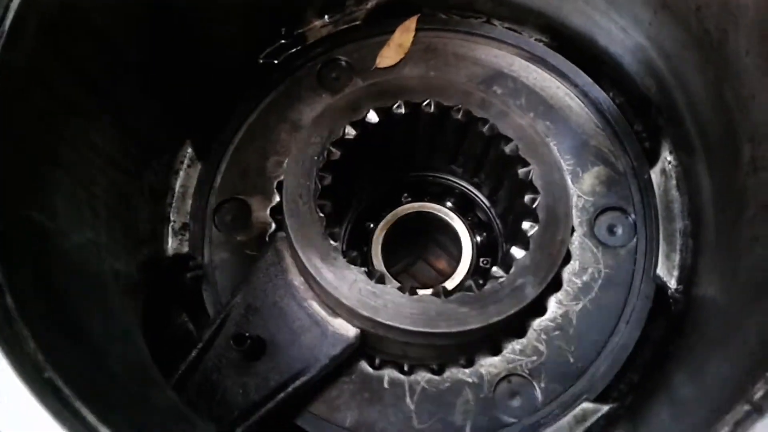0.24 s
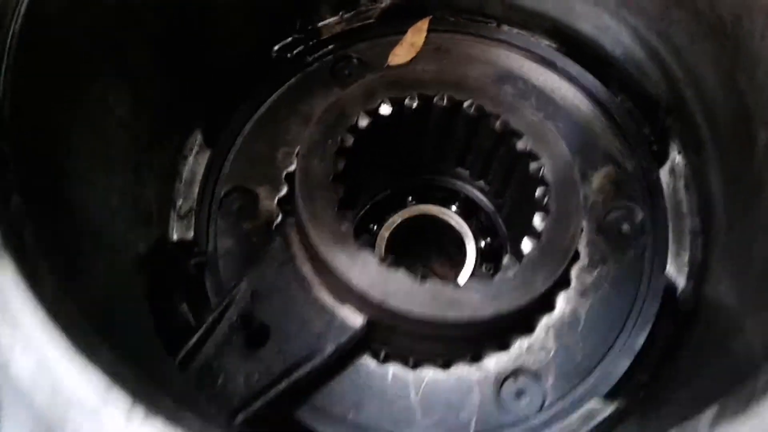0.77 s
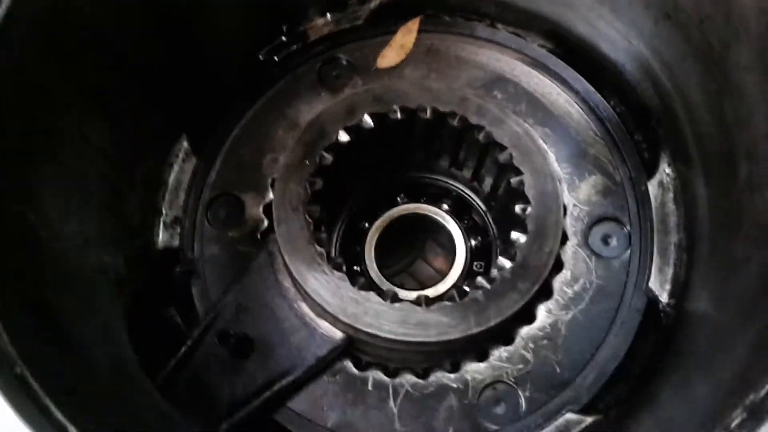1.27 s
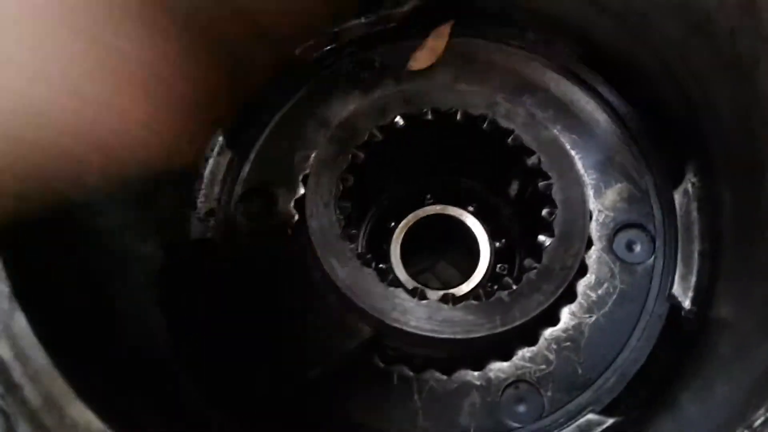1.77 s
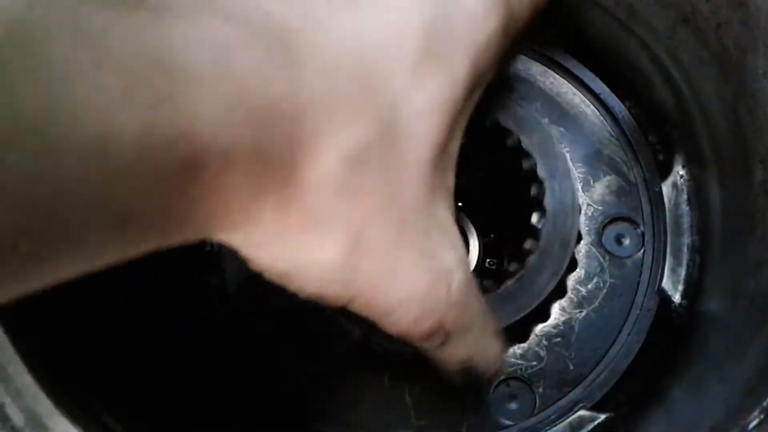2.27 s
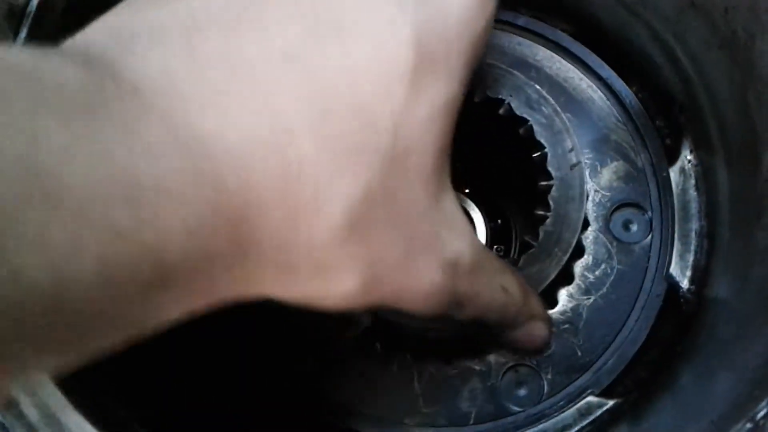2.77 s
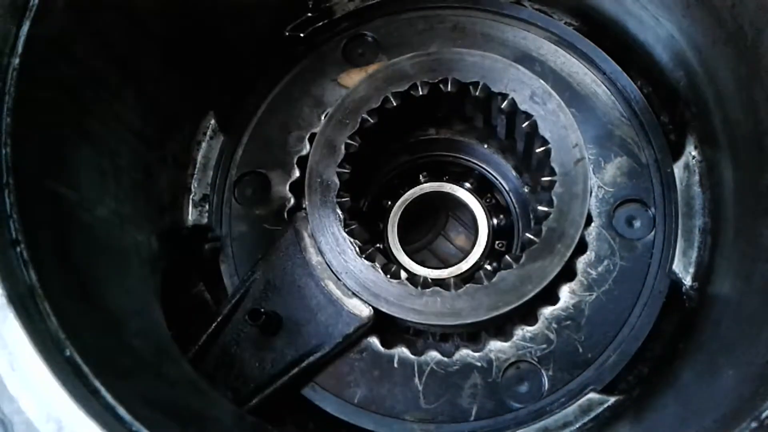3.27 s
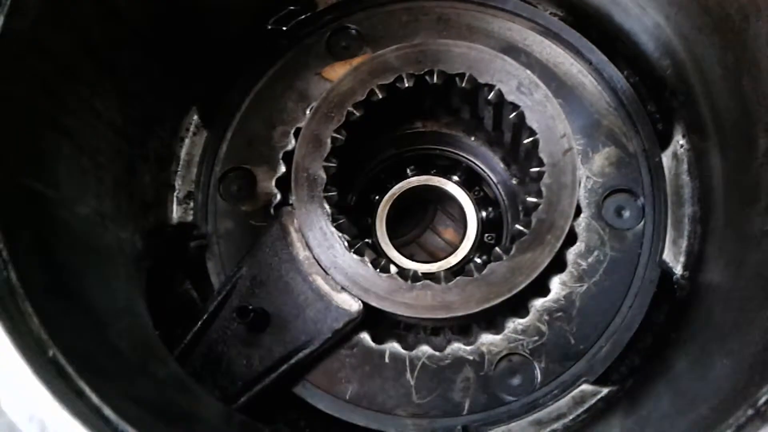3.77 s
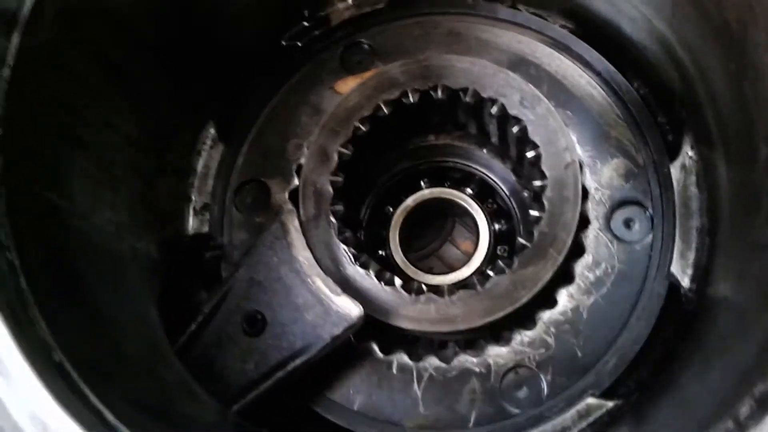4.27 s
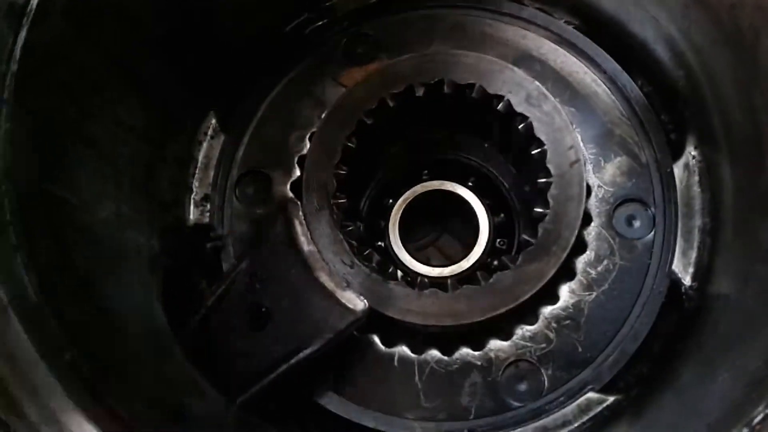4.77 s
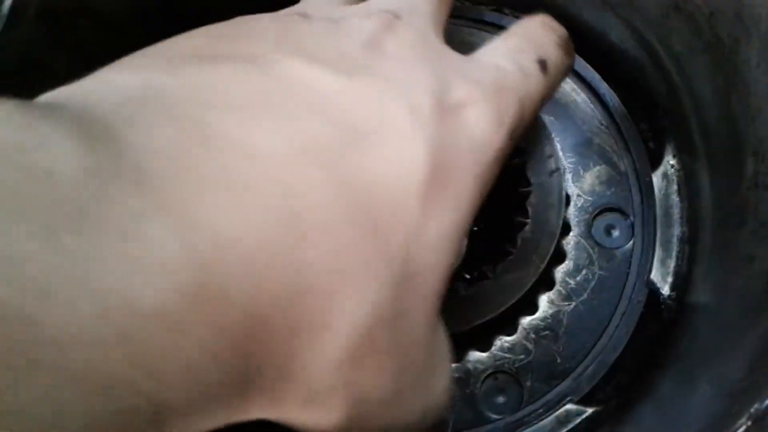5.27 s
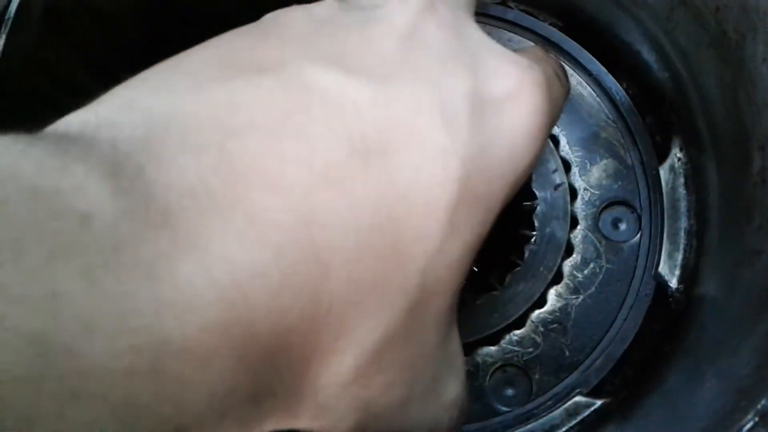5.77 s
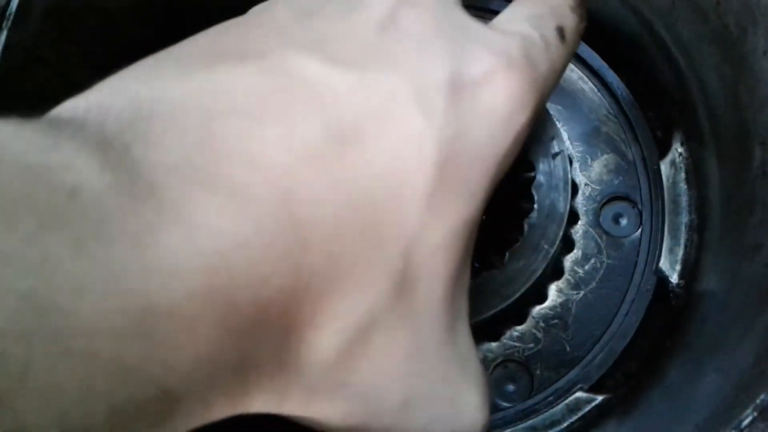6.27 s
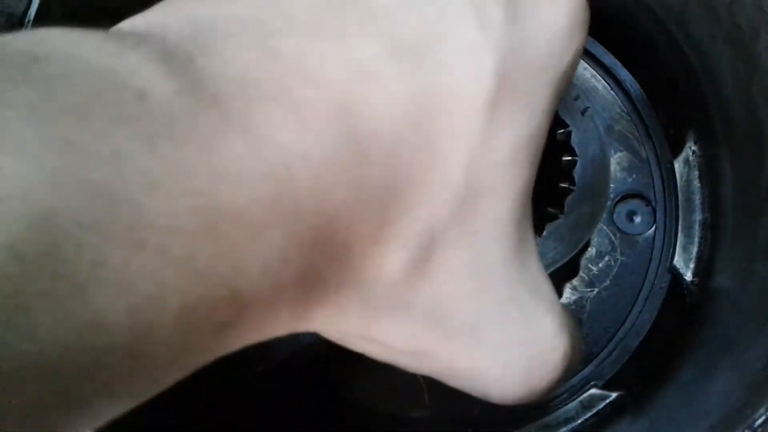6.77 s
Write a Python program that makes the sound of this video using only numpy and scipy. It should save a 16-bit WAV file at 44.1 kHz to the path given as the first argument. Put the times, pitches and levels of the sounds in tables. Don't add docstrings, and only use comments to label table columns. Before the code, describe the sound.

Very close, a loose steel gear clicks and clanks in a deep metal housing. Shaft knocks come in tight clusters, then fingers turn it tooth on tooth with quick scrapes and short pinging rings. More hard knocks follow near four seconds, one heavy clank before five, then sparse clicks and a rattling roll. Low workshop air noise and a faint cricket lie behind; the sound leans right, duller on the left.

```python
import sys
import numpy as np
from scipy import signal
from scipy.fft import rfft, irfft, next_fast_len
from scipy.io import wavfile
from scipy.ndimage import uniform_filter1d

SR = 44100
rng = np.random.default_rng(int(sys.argv[2]) if len(sys.argv) > 2 else 0)


def store_wav(level_fs):
    pcm = np.round(np.clip(np.atleast_2d(level_fs), -1, 1) * 32767)
    wavfile.write(sys.argv[1], SR, pcm.T.astype(np.int16))


def volts(x):
    e = np.asarray(x, float) / 20
    return 10 ** e


N = 310271

# (time [s], teeth peak [dB], teeth note [Hz], web peak [dB], web note [Hz])
KNOCK_OUTER = [(0.3152, -34.5, 2100, -34, 1340), (0.3268, -31, 2300, -28, 1260),
               (0.956, -27.5, 3310, -24, 588), (0.9624, -30.5, 3350, -28, 720),
               (1.1224, -40, 3310, -44.5, 1680), (1.281, -21.5, 3160, -33, 620),
               (1.287, -29, 3300, -30, 716), (1.3173, -35, 2466, -39, 1970), (1.3523, -31, 3500, -48, 1970),
               (1.5399, -42, 2300, -28, 635), (3.7035, -36, 3360, -39, 1780),
               (3.8726, -29, 3320, -24, 1690), (3.889, -37.5, 3170, -32, 1220),
               (3.8984, -30, 3050, -25, 970), (3.907, -26, 3130, -24, 940), (3.918, -33, 4280, -34, 930),
               (3.9377, -21, 3460, -37, 1660), (3.943, -30, 3360, -30.5, 1690),
               (3.982, -35, 3370, -35, 600), (4.0227, -39.5, 2360, -33.5, 604),
               (4.2253, -34.5, 2960, -35.5, 640), (4.2416, -21, 2700, -23.5, 700),
               (4.248, -27.5, 2780, -28, 683), (4.2544, -40, 2700, -42, 920),
               (4.5375, -34.5, 5020, -41, 1830), (4.7634, -22.5, 3550, -13, 1493),
               (4.7701, -20, 3310, -10.5, 810), (5.159, -47, 3270, -52, 895)]
KNOCK_INNER = [(0.2593, -46, 3600, -47.5, 1980), (0.3316, -22, 3540, -26, 2070),
               (0.3367, -24.5, 4080, -49, 1710), (1.2351, -48, 4230, -40, 1220),
               (1.253, -22.5, 3310, -30, 2030), (1.259, -27, 3230, -27, 1660), (1.267, -13, 4150, -25, 614),
               (1.275, -22.5, 3000, -36, 590), (1.3373, -33.5, 4000, -34.5, 1340),
               (1.3674, -32, 4060, -39, 1990), (2.0343, -43, 3800, -40, 940),
               (2.1081, -37, 3770, -40.5, 2010), (2.1188, -45, 3700, -53, 1710),
               (3.6627, -27.5, 4270, -38, 1640), (3.9254, -19, 4300, -44, 960),
               (3.93, -11, 4110, -19, 2080), (4.3092, -12.5, 4530, -20, 1770),
               (4.3234, -10.5, 4070, -18, 624), (4.3311, -22, 3310, -49, 950),
               (4.7864, -23.5, 3220, -22, 580)]
TURN_OUTER = [(2.3197, -19, 3170, -19.5, 1180), (2.376, -35, 4150, -25, 970), (2.385, -34, 4150, -29, 940),
              (2.4167, -25.5, 3780, -34, 945), (2.435, -28, 3230, -30, 1860),
              (2.5236, -12, 3500, -16, 1754), (2.5376, -22, 3020, -14.5, 1300),
              (2.548, -10.5, 3260, -14, 1276), (2.5594, -12, 3220, -18.5, 950),
              (2.5704, -21, 3230, -25.5, 1330), (2.6887, -16.5, 4260, -13, 1180),
              (2.7247, -24.5, 3200, -21, 920), (2.748, -36, 4200, -34, 700), (6.2868, -13, 3290, -24, 1236)]
TURN_INNER = [(2.2884, -35, 4250, -25.5, 970), (2.3452, -33, 4220, -41, 595),
              (2.4439, -9.5, 3570, -12, 960), (2.4514, -18, 4300, -17, 1840),
              (2.4658, -26, 4270, -39, 1690), (2.487, -36, 4160, -29, 1700),
              (2.701, -16.5, 4450, -17, 1590), (5.5084, -42.5, 3870, -36, 660),
              (5.5688, -13, 4160, -17, 1185), (5.5804, -29, 4150, -22, 1844),
              (6.2413, -16.5, 3770, -18, 1960), (6.3051, -31, 4150, -39, 620)]
ROLL_OUTER = [(6.4776, -32, 4140, -30.5, 940), (6.4916, -18, 3200, -25.5, 945),
              (6.8024, -41, 2580, -30, 575)]
ROLL_INNER = [(6.4178, -35, 3700, -42.5, 960), (6.511, -17.5, 4200, -26.5, 2200),
              (6.5255, -22, 4130, -34, 1240), (6.5392, -12, 4080, -18, 2170),
              (6.5531, -22, 4250, -23, 1250), (6.5614, -15, 4060, -19.5, 1270),
              (6.5722, -15, 4260, -21.5, 936), (6.6094, -37, 4150, -32, 700),
              (6.6473, -25, 4020, -38, 1300), (6.69, -38, 4070, -33, 580), (6.8125, -39.5, 4260, -29, 895),
              (7.0315, -37, 3130, -27, 613)]
# (contacts, contact time [ms], noisy part [dB], decay factor [1], share of the first blow [1])
KINDS = [(KNOCK_OUTER, 6.7, 2.36, 0.66, 1.01), (KNOCK_INNER, 4.3, 4.6, 0.71, 1.03),
         (TURN_OUTER, 5.5, -2.2, 0.74, 0.83), (ROLL_OUTER, 5., -5, 0.74, .2),
         (TURN_INNER, 6.1, -1.5, 0.57, 1.01), (ROLL_INNER, 4.9, -4, .6, 0.12)]
# (time [s], peak [dB])
EDGES = [(0.2598, -57), (0.334, -38), (0.9574, -44), (1.1207, -44.5), (1.2515, -27), (1.267, -27),
         (6.511, -40), (2.0343, -45), (2.1188, -39.5), (2.3196, -38), (2.342, -38.5), (2.4174, -43),
         (2.4437, -27), (2.522, -35), (2.5456, -31.5), (2.687, -37), (6.649, -47), (3.663, -38.5),
         (3.923, -29), (3.93, -21), (4.3106, -25.5), (4.321, -28), (5.571, -39.5), (6.2406, -26),
         (6.2854, -33)]
# (frequency [Hz], level [dB])
EDGE = [(3500, -12.5), (5000, 9), (6500, 1.5), (8500, -9.5), (12000, -19.5), (16000, -26.5)]
# (frequency [Hz], level [dB], T60 [s])
TEETH = [(2520, 5, 0.011), (2972, -3.5, 0.047), (3205, -0.5, 0.034), (3347, 4.5, 0.016), (3770, -2, 0.038),
         (4110, 0, 0.043), (4260, -5, 0.052), (4694, 1, 0.014), (5030, -7.5, 0.03)]
WEB = [(694, -2, 0.036), (814, -10.5, 0.059), (952, -3, 0.074), (1250, 12, 0.017), (1319, -6.5, 0.022),
       (1700, -0.5, 0.12), (1840, 10, 0.037), (2070, -3.5, 0.1)]
# (level [dB], T60 [s])
TOOTH_NOTE, WEB_NOTE = (0, 0.026), (9.1, 0.046)

# (time [s], frequency [Hz], level [dB], T60 [s])
NOTES = [(1.234, 4150, -44, .1), (1.239, 1340, -41, 0.093), (2.287, 1780, -36, 0.072),
         (2.379, 953, -28, 0.17), (2.38, 1700, -33, 0.14), (2.445, 955, -20.5, .08),
         (2.451, 1820, -15, 0.047), (2.549, 3230, -12, .04), (2.561, 3225, -15, 0.074),
         (2.561, 4280, -24.5, 0.08), (2.689, 1194, -18.5, 0.066), (2.69, 1837, -16, 0.042),
         (2.7, 3160, -24, 0.09), (2.703, 4300, -22, 0.057), (.26, 2000, -44, .03), (.315, 480, -32, .05),
         (2.524, 4700, -25, .03), (2.526, 1760, -25, .04), (3.872, 3100, -28, .08), (3.872, 4400, -34, .1),
         (3.898, 1800, -30, .05), (3.906, 3130, -26, .05), (3.931, 4120, -19, .05), (3.933, 3313, -21, .06),
         (6.51, 10500, -54, .03), (6.647, 10300, -57, .03), (4.31, 4700, -24, .03), (4.311, 3280, -21, .05),
         (4.324, 4070, -25, 0.04), (4.7646, 1490, -7, 0.023), (4.768, 3307, -20.5, 0.056),
         (4.768, 4560, -29, 0.054), (5.569, 1175, -25.5, 0.044), (5.57, 1846, -22, 0.052),
         (5.585, 702, -39.5, 0.22), (5.624, 922, -41, 0.18), (6.242, 3790, -16.5, 0.029),
         (6.243, 1915, -21, 0.029), (6.255, 1840, -36.5, .12), (6.287, 3330, -7, .02),
         (6.287, 1270, -22, 0.036), (6.416, 3790, -40, 0.09), (6.478, 950, -31, 0.051),
         (6.478, 1900, -30, .04), (6.492, 3150, -23.5, 0.073), (6.54, 2150, -29, .04),
         (6.555, 3150, -21, 0.061), (6.562, 1230, -21.5, 0.067)]

# (time [s], peak [dB], decay factor [1])
FLOOR_THUDS = [(0.066, -42.5, 0.69), (0.343, -31, 0.88), (0.966, -8, 0.87), (1.267, -12, 1.14),
               (1.473, -49, 1.6), (2.217, -40, 0.35), (2.285, -29.5, 1.6), (2.377, -18.5, 1.08),
               (3.661, -36, 0.82), (3.708, -33, 0.7), (3.859, -20, 1.2), (3.924, -18, 0.63),
               (4.013, -10, 0.85), (4.344, -17.5, 0.66), (4.687, -37, 1.5), (5.505, -30.5, 0.84),
               (5.849, -40, 0.69), (6.242, -22.5, 0.71), (6.802, -29, 0.81)]
WALL_THUDS = [(0.33, -24.5, 0.63), (2.027, -28.5, 0.4), (2.535, -23, 1.46), (3.45, -37.5, 0.56),
              (4.763, -18, 1.14), (5.566, -31.5, 2.43), (6.42, -32, 10), (6.689, -34, 0.95)]
RIM_THUDS = [(0.957, -11, 0.6), (1.539, -28.5, 0.92), (2.055, -32, 0.33), (2.263, -37.5, 0.68),
             (2.317, -21.5, 1.16), (2.44, -18.5, 0.62), (2.516, -29, 0.86), (2.569, -19, 0.32),
             (2.692, -17, 0.47), (2.704, -16.5, 0.66), (3.964, -20, 0.37), (4.242, -20.5, 0.55),
             (4.316, -21, 0.27), (5.156, -39, 0.29), (5.766, -41.5, 1.1), (6.286, -18.5, 0.46),
             (6.513, -22, 0.59), (6.558, -17, 0.66), (6.648, -24.5, 0.66), (7.004, -31, 0.39),
             (4.765, -17.5, 0.65)]
FLOOR_HZ, WALL_HZ, RIM_HZ = 199.7, 268, 378.5
# (frequency [Hz], level [dB], T60 [s])
HOUSING = [(97.9, -12.5, 1), (129.4, -13, 0.55), (152, -28, 0.9), (191.1, -19.5, 0.58), (210, -3, 0.15),
           (244.9, -12.5, 0.5), (284.2, 4.5, 0.14), (318, -3, 0.29), (368.6, -1.5, 0.17), (415, -6, 0.36),
           (451.6, 12.5, .15), (530, -22.5, 0.49)]
# (time [s], level [dB])
LIP = [(.97, -38.5), (4.77, -35.5)]
LIP_HZ, LIP_T60_S = 542, 0.45

# (time [s], low note [dB], partner [dB], T60 as the grip allows [s])
RINGS = [(.262, -54.5, -59, 0.22), (1.289, -50, -57, 0.45), (2.293, -45.5, -49, 0.59),
         (2.37, -38, -47, 0.46), (2.462, -31, -33, 0.24), (2.557, -50, -33, 0.12), (2.698, -33, -34, 0.15),
         (4.331, -67, -62, .32), (5.511, -71, -49, .3), (5.572, -17.5, -29, 0.39), (5.769, -54, -64, 0.97),
         (5.929, -65, -51, 0.87), (6.168, -58, -52, .3), (6.253, -51, -50, .32), (6.292, -28, -28, 0.18),
         (6.514, -32, -30, 0.29), (6.541, -21, -33, 0.41), (6.581, -35.5, -50, 1)]
HELD = [.06, .12, .08, .065, .045, .045, .07, .15, .05, .182, .15, .25, .06, .04, .12, .016, .032, .118]
RING_HZ, PARTNER_HZ = 4151, 4242
RING_SPLIT_HZ, RING_BEAT_S = 8.2, 0.05
# (time [s], low note [dB], high note [dB], T60 [s])
RACE = [(.30, -72, -85, .2), (1.275, -80, -68, .45), (2.33, -68, -80, .2), (2.445, -49, -75, 0.18),
        (2.53, -56, -65, 0.25), (2.695, -59.5, -67, 0.32), (3.935, -78, -62, 0.42), (5.51, -67, -79, .2),
        (5.6, -82, -76, .4), (6.25, -70, -80, .2), (6.29, -62, -80, .2), (6.511, -57, -84, 0.22),
        (6.646, -57, -82, 0.12)]
RACE_HZ = 10870, 11070

# (start [s], end [s], teeth [dB], web [dB], swell from start to end [dB])
SCRAPES = [(2.377, 2.419, -47, -28, -3), (2.42, 2.457, -33.5, -44, 3), (5.599, 5.671, -68, -50.5, 0),
           (6.392, 6.499, -47, -48, 12), (6.587, 6.73, -74, -73, -21), (2.452, 2.5, -57, -47, -5),
           (2.7, 2.76, -46, -40.5, -23), (6.5, 6.585, -45, -41, 9)]
# (start [s], end [s], teeth [dB], web [dB], swell [dB])
GRINDS = [(3.855, 3.93, -41.5, -38.5, 6), (1.247, 1.295, -41, -45, -4), (4.24, 4.262, -43, -39, -13),
          (.958, .99, -51, -38, -20)]
# (frequency [Hz], level [dB], T60 [s])
SLIDE_TEETH = [(2990, -8, .09), (3150, 0, 0.052), (3310, -8, 0.056), (3810, -2, .04), (4150, -3.5, 0.08),
               (4800, -9, .07), (5000, -3.5, 0.035)]
SLIDE_WEB = [(677, -4.5, .07), (938, 2.5, 0.052), (1340, -10.5, 0.1), (1690, -3.5, 0.086),
             (1840, -4, 0.067), (2300, -13, .04)]
GRIND_TEETH = [(2620, -13, .05), (3170, 5, .07), (3310, -3.5, .07), (4110, 1.5, 0.099), (4400, -5, 0.13),
               (4700, -12, 0.054)]

# (frequency [Hz], left minus right [dB])
COVERED = [(60, -1.5), (110, -1), (200, -6), (380, -7.5), (700, -12.5), (1290, -19), (2380, -30.5),
           (4400, -47.5), (6500, -30.5), (10000, -16)]

# (start [s], end [s], start frequency [Hz], end frequency [Hz], level [dB])
TRILLS = [(0.023, 0.237, 3600, 3760, -70), (1.8, 2.209, 3640, 3800, -57), (3.392, 3.8, 3900, 3770, -65.5),
          (4.355, 4.6, 3640, 3630, -63), (5.305, 5.765, 3770, 3730, -60.5)]
TRILL_HZ, TRILL_BLUR_HZ = 38.2, 60

AIR_RING_HZ, AIR_RING_WIDTH_HZ, AIR_RING_DB = 4140, 90, -77

# (frequency [Hz], level per Hz [dB])
ROOM = [(15, -50), (25, -24), (130, 0), (173, -11), (351, -13.5), (385, -17.5), (476, -21.5), (728, -20.5),
        (2150, -21), (3980, -20.5), (7000, -41), (9100, -53), (15400, -120)]
# (frequency [Hz], left minus right [dB])
ROOM_BALANCE = [(60, -2), (200, -4.5), (380, -6.5), (700, -7.5), (1290, -12.5), (2380, -17), (4400, -32)]
# (frequency [Hz], coherence [0-1])
ROOM_LIKENESS = [(60, 1), (130, 0.79), (290, 0.3), (640, 0.1), (1400, .05)]
# (frequency [Hz], level per Hz [dB])
HISS = [(300, 9.5), (3000, -1.5), (8000, 4), (16000, 1.5)]
ROOM_DB, HISS_DB = -57, -73.5
# (time [s], level over the room bass [dB])
SWAYS = [(1.0, 10), (2.3, 6.2), (4.2, 9.4), (6.2, 9.7)]
SWAY_S = 0.16
# (time [s], level [dB])
GAIN = [(0, -3), (.93, -4), (1.0, 5), (2.4, 7), (2.8, 2.5), (3.2, 0.5), (3.7, 1.5), (3.95, 5.5), (4.9, 5),
        (7.04, 4)]


def along(table, hz):
    f, v = np.transpose(table)
    return np.interp(np.log(hz + 1), np.log(f + 1), v)


def colour(x, table):
    n = next_fast_len(len(x))
    response = volts(along(table, np.fft.rfftfreq(n, 1 / SR)))
    return irfft(rfft(x, n) * response, n)[:len(x)]


def band(x, low_hz, high_hz):
    sos = signal.butter(4, [low_hz, high_hz], "band", fs=SR, output="sos")
    return signal.sosfilt(sos, x)


def add(out, s, x):
    i = int(s * SR)
    out[i:i + len(x)] += x[:N - i]


def peak(x, db):
    return x * volts(db) / np.max(np.abs(x))


def walk(rate):
    k = int(SR / rate)
    held = np.repeat(rng.standard_normal(N // k + 1), k)
    return uniform_filter1d(uniform_filter1d(held, k), k)[:N]


def strike(modes, push, seconds, edges_hz, near_hz, scatter_db, dense_db, dense_t60, decay=1, focus_db=14):
    hz, db, t60 = np.transpose(modes)[:, :, None]
    size, shift, phase = rng.standard_normal((3, len(modes), 1))
    t = np.arange(int(seconds * SR)) / SR
    waves = np.sin(2 * np.pi * hz * (1 + 0.0038 * shift) * t + phase)
    db = db + scatter_db * size - focus_db * np.abs(np.log2(hz / near_hz))
    ring = np.sum(volts(db - db.max() - 60 * t / (t60 * decay)) * waves, axis=0)
    dense = volts(dense_db - 60 * t / (dense_t60 * decay)) * rng.standard_normal(len(t))
    return band(signal.fftconvolve(ring + dense, push), *edges_hz)


def chatter(contact_ms, blow=25, rise_ms=.01):
    t = np.arange(1024) / SR * 1000
    closing = 1 - np.exp(-t / rise_ms)
    parting = np.exp(-(t / max(contact_ms, .3)) ** 2.1)
    rattle = rng.standard_normal(len(t)) ** 3 * parting * closing
    return rattle + blow * (t == 0)


def edge(contact_ms):
    spray = np.tanh(chatter(contact_ms, blow=0) / 3)
    return colour(np.pad(spray, (0, 256)), EDGE)[:1024]


def clicks():
    out = np.zeros(N)
    for contacts, contact_ms, noisy_db, decay, share in KINDS:
        rise_ms = max(1.9 * (1 - share), .01)
        for s, teeth_db, teeth_hz, web_db, web_hz in contacts:
            push = chatter(contact_ms, 25 * share, rise_ms)
            teeth = strike(TEETH + [(teeth_hz, *TOOTH_NOTE)], push, 0.13, (1900, 4750 + 400 * share), teeth_hz,
                           scatter_db=1.5, dense_db=noisy_db - 11.5, dense_t60=0.068, decay=decay)
            push = chatter(contact_ms, 70 * share, rise_ms)
            web_edges_hz = 0.26 * web_hz, min(900 + web_hz, 400 + 1.18 * web_hz)
            web = strike(WEB + [(web_hz, *WEB_NOTE)], push, .2, web_edges_hz, web_hz, scatter_db=3,
                         dense_db=noisy_db - 0.5, dense_t60=0.13, decay=decay, focus_db=1)
            add(out, s, peak(teeth, teeth_db))
            add(out, s, peak(edge(contact_ms), teeth_db - 42))
            add(out, s, peak(web, web_db))
    for s, db in EDGES:
        add(out, s, peak(edge(6.1), db))
    return out


def notes():
    out, t = np.zeros(N), np.arange(int(.25 * SR)) / SR
    rise = 1 - np.exp(-t / 0.0011)
    for s, hz, db, t60 in NOTES:
        add(out, s, volts(db - 60 * t / t60) * rise * np.sin(2 * np.pi * hz * t))
    return out * volts(walk(90))


def thuds():
    out = np.zeros(N)
    for blows, hz in ((FLOOR_THUDS, FLOOR_HZ), (WALL_THUDS, WALL_HZ), (RIM_THUDS, RIM_HZ)):
        for s, db, decay in blows:
            push = np.hanning(int(.4 * SR / hz))
            body = strike(HOUSING, push, 0.32, (95, 3.07 * hz), hz, scatter_db=3,
                          dense_db=6.5, dense_t60=0.28, decay=max(decay, .2))
            add(out, s, peak(body, db))
    t = np.arange(int(.4 * SR)) / SR
    for s, db in LIP:
        rise = 1 - np.exp(-t / 0.0066)
        add(out, s, volts(db - 60 * t / LIP_T60_S) * rise * np.sin(2 * np.pi * LIP_HZ * t))
    return out


def rings():
    out, t = np.zeros(N), np.arange(int(.5 * SR)) / SR
    swell = 1 - np.exp(-t / 0.0022)
    split_cycles = RING_HZ * t + RING_SPLIT_HZ * (t - RING_BEAT_S)
    pair = np.sin(2 * np.pi * RING_HZ * t) + 0.37 * np.sin(2 * np.pi * split_cycles)
    partner = volts(-240 * t) * np.sin(2 * np.pi * PARTNER_HZ * t)
    for (s, db, partner_db, t60), held in zip(RINGS, HELD):
        note = volts(db) * pair + volts(partner_db) * partner
        touched = np.exp(-np.maximum(t - held, 0) / 0.0048) + volts(-38)
        add(out, s, note * volts(-60 * t / t60) * swell * touched)
    low, high = np.sin(2 * np.pi * np.outer(RACE_HZ, t))
    for s, low_db, high_db, t60 in RACE:
        line = volts(low_db) * low + volts(high_db) * high
        add(out, s, line * volts(-60 * t / t60) * (1 - np.exp(-t / 0.01)))
    return out


def scrapes():
    out = np.zeros(N)
    for rows, teeth in ((SCRAPES, SLIDE_TEETH), (GRINDS, GRIND_TEETH)):
        for s, until, teeth_db, web_db, swell_db in rows:
            t = np.arange(s, until, 1 / SR)
            slips = rng.random(len(t)) < 3000 / SR
            grains = rng.standard_normal(len(t)) * slips * signal.windows.tukey(len(t), .3)
            for modes, db, edges_hz in ((teeth, teeth_db, (2100, 5300)), (SLIDE_WEB, web_db, (500, 2400))):
                body = strike(modes, grains, 0.12, edges_hz, 1100, scatter_db=-1.8,
                              dense_db=-12, dense_t60=0.044, focus_db=4.5)
                progress = np.minimum(np.arange(len(body)) / len(t), 1)
                level = db + swell_db * (progress - .5)
                add(out, s, volts(level) * body / np.std(body[:len(t)]))
    return out


def housing_tail(near):
    t = np.arange(int(.25 * SR)) / SR
    walls = volts(-43 - 60 * t / 0.17) * rng.standard_normal(len(t)) * (1 - np.exp(-t / 0.0013))
    return signal.fftconvolve(near, walls)[:N]


def ports(near):
    cepstrum = irfft(np.log(volts(along(COVERED, np.fft.rfftfreq(2048, 1 / SR)))))
    cepstrum[1:1024] *= 2
    cepstrum[1025:] = 0
    n = next_fast_len(N + 2048)
    cover = rfft(irfft(np.exp(rfft(cepstrum))), n)
    right = 2 * rfft(near, n) / np.abs(1 + cover)
    return irfft([cover * right, right], n)[:, :N]


def cricket():
    out = np.zeros(N)
    for s, until, start_hz, end_hz, db in TRILLS:
        t = np.arange(0, until - s, 1 / SR)
        throb = np.maximum(np.sin(2 * np.pi * TRILL_HZ * t) + 0.77, 0)
        uneven = volts(4.5 * walk(39.3)[:len(t)]) * signal.windows.tukey(len(t), .3)
        hz = np.linspace(start_hz, end_hz, len(t)) + TRILL_BLUR_HZ * walk(121.2)[:len(t)]
        add(out, s, volts(db) * throb * uneven * np.sin(2 * np.pi * np.cumsum(hz) / SR))
    return out


def background_gain_db():
    return np.interp(np.arange(N) / SR, *np.transpose(GAIN))


def hum():
    half_hz = AIR_RING_WIDTH_HZ / 2
    air = band(rng.standard_normal(N), AIR_RING_HZ - half_hz, AIR_RING_HZ + half_hz)
    return volts(AIR_RING_DB + background_gain_db() + 3 * walk(5)) * air / np.std(air)


def room():
    n = next_fast_len(N)
    hz = np.fft.rfftfreq(n, 1 / SR)
    like = np.clip(along(ROOM_LIKENESS, hz), 0, 1)
    left = volts(along(ROOM_BALANCE, hz))
    right = volts(along(ROOM, hz)) / np.sqrt(1 + left ** 2 + 2 * like * left)
    shared, own = rfft(rng.standard_normal((2, n)))
    mixed = like * shared + np.sqrt(1 - like ** 2) * own
    air = irfft([left * right * mixed, right * shared], n)[:, :N]
    air = air * volts(ROOM_DB) / np.std(air.mean(axis=0))
    bass = signal.sosfilt(signal.butter(2, 450, fs=SR, output="sos"), air)
    t = np.arange(N) / SR
    bass_db = 1.3 * walk(1.3) + 1.4 * walk(16)
    for s, db in SWAYS:
        after = np.maximum(t - s, 0) / SWAY_S
        bass_db = bass_db + db * after * np.exp(1 - after)
    air = air + bass * (volts(bass_db) - 1)
    hiss = np.array([colour(white, HISS) for white in rng.standard_normal((2, N))])
    air = air + hiss * volts(HISS_DB) / np.std(hiss)
    return air * volts(background_gain_db())


def scene():
    near = clicks() + notes() + thuds() + rings() + scrapes()
    near = near + housing_tail(near)
    return ports(near + cricket() + hum()) + room()


def roll_off(x):
    return signal.sosfilt(signal.butter(12, 16460, fs=SR, output="sos"), x)


def record(dry):
    ceiling, knee = .98, 8
    rounded = dry / (1 + (dry / ceiling) ** knee) ** (1 / knee)
    top = signal.ellip(10, .2, 70, 15680, fs=SR, output="sos")
    mix = signal.sosfilt(top, rounded)
    return roll_off(mix)


dry = scene()
out = record(dry)
store_wav(out)
```